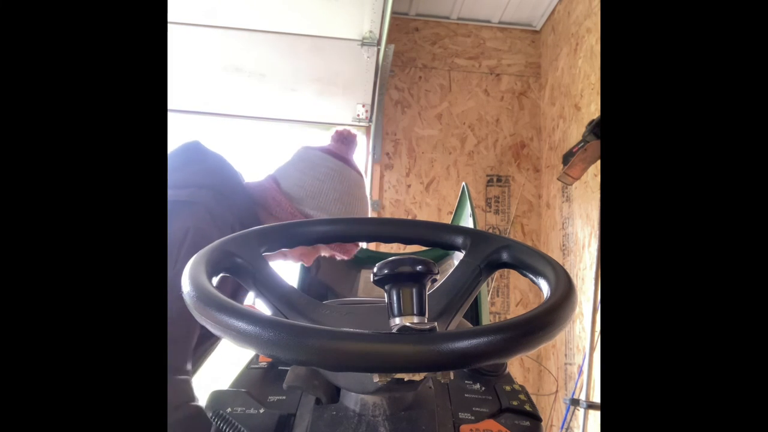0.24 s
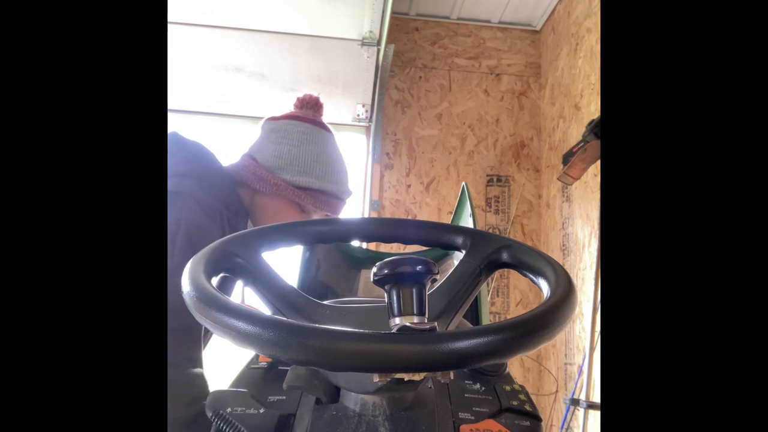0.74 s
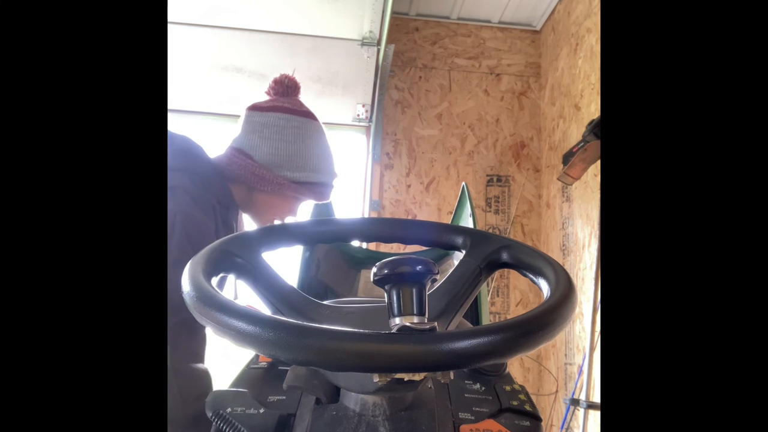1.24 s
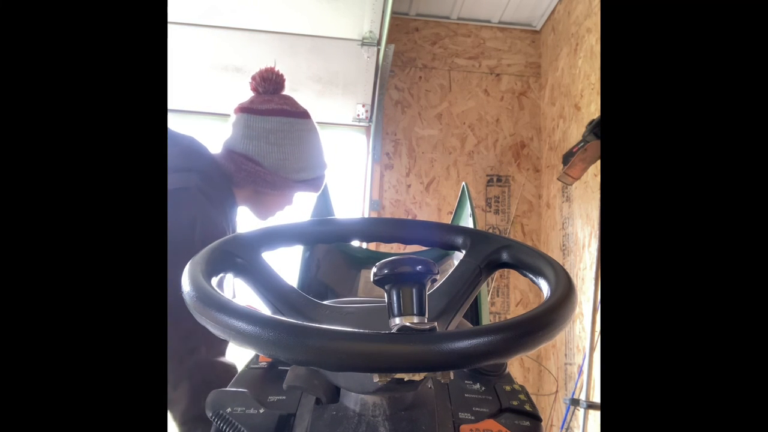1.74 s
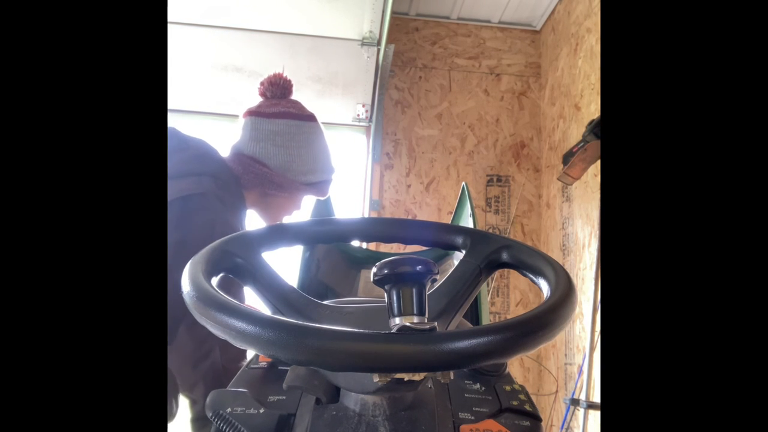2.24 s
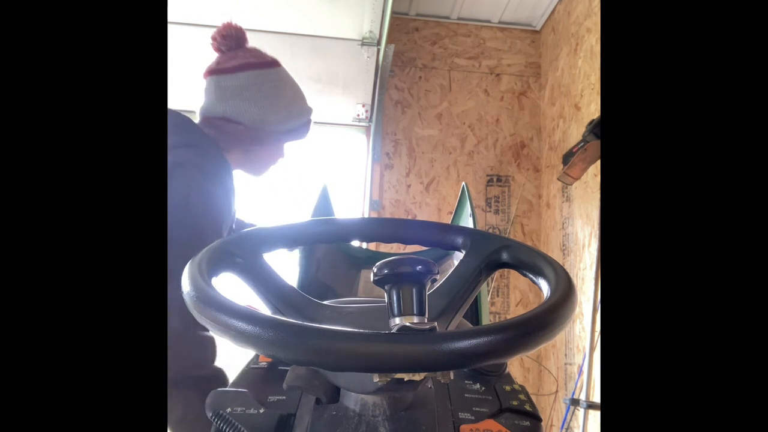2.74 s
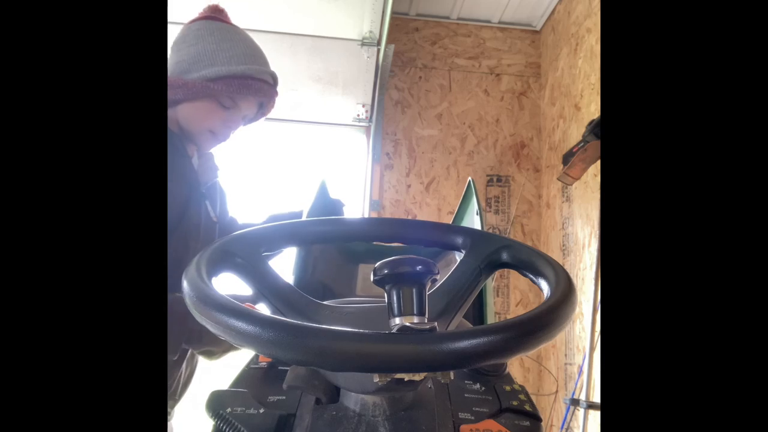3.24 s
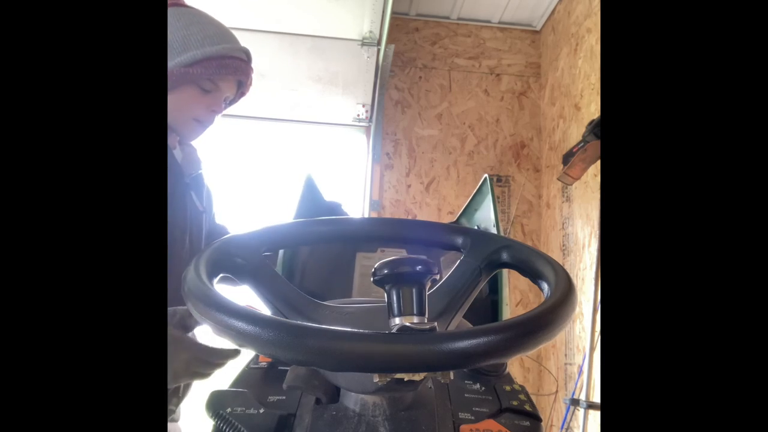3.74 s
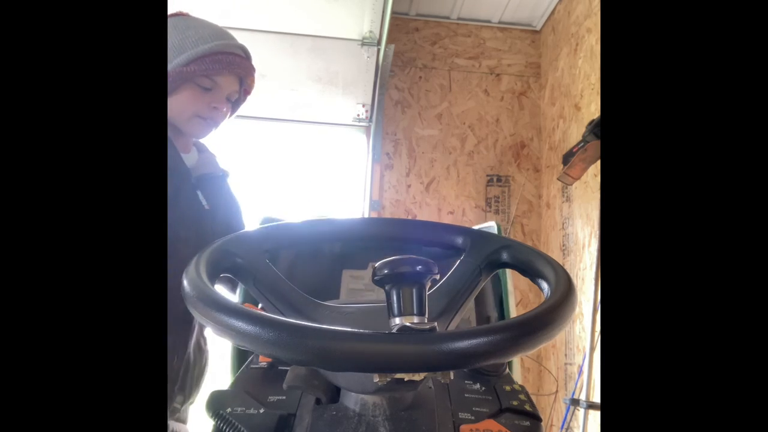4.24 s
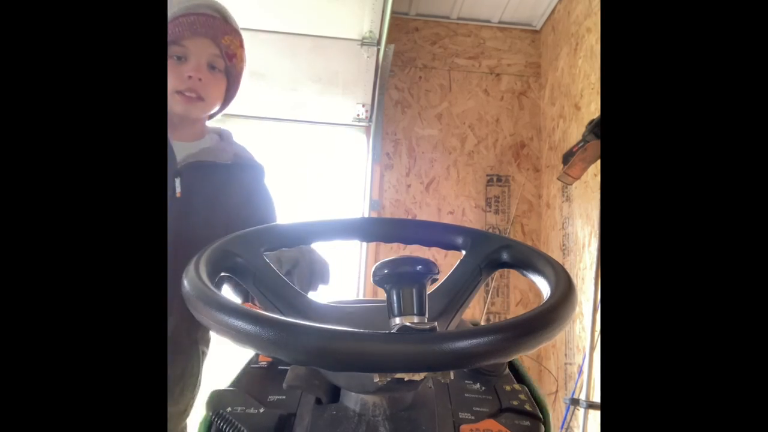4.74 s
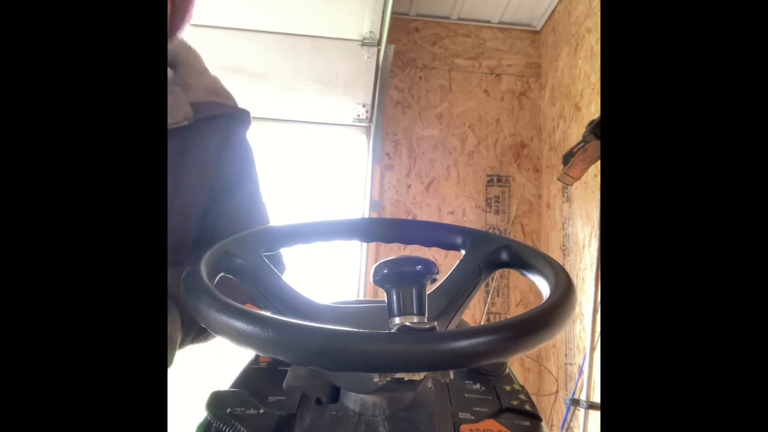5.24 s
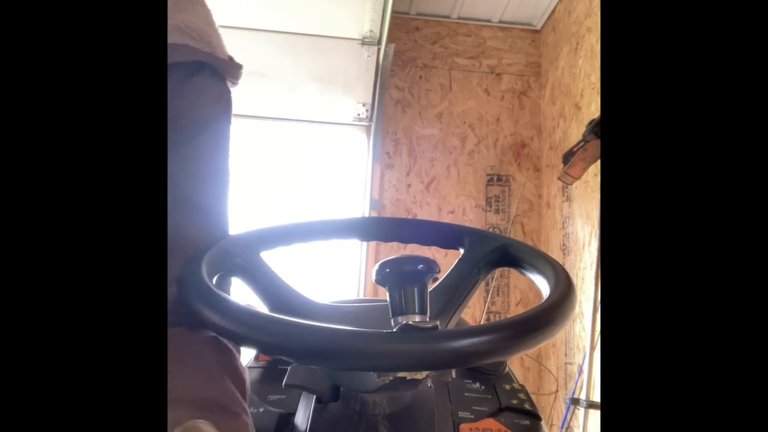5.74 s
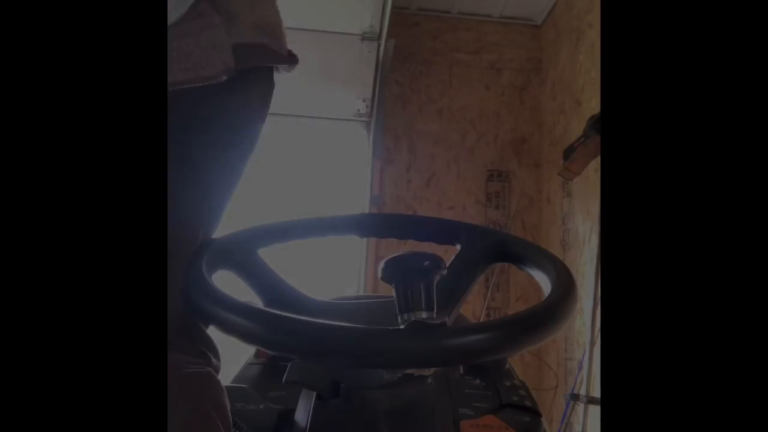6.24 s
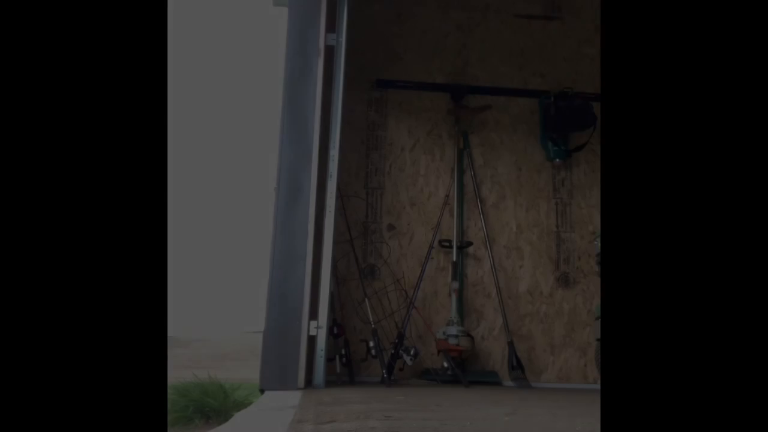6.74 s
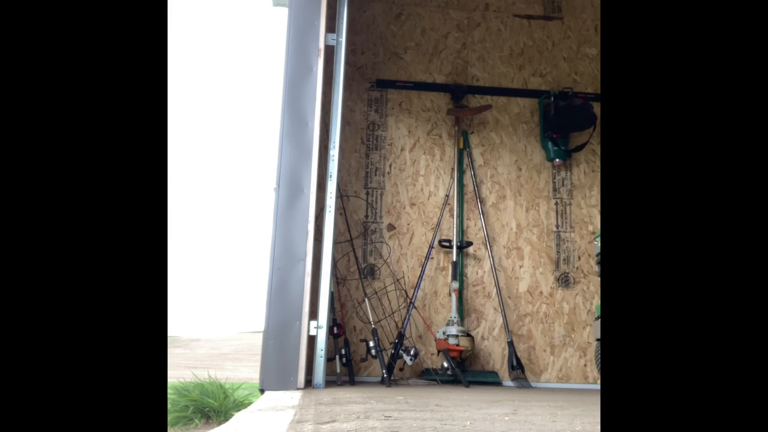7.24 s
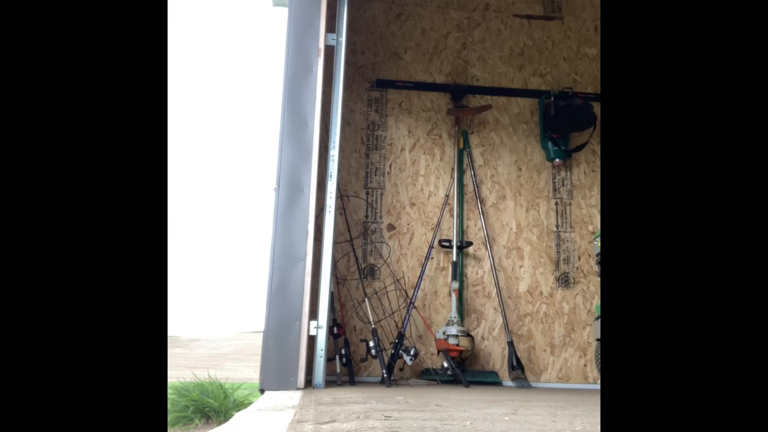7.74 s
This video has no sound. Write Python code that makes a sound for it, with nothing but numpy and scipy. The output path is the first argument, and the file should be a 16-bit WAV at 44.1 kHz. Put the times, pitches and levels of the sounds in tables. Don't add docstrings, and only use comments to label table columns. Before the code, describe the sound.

Close in a small wooden shed, fingers tap and sleeves rustle on loose plastic while faint birds whistle outside. Hollow knocks build into booming bangs and a hard slam with latch clinks and rattling. Smaller clunks follow, the sound dips nearly silent, then a lever clunks and an electric starter grinds and whines unevenly to the end.

```python
import sys
import numpy as np
from scipy import signal
from scipy.fft import rfft, irfft, next_fast_len
from scipy.io import wavfile
from scipy.ndimage import uniform_filter1d

SR = 44100
rng = np.random.default_rng(int(sys.argv[2]) if len(sys.argv) > 2 else 0)


def wav_out(sig):
    wavfile.write(sys.argv[1], SR, np.round(np.clip(np.atleast_2d(sig).T, -1, 1) * 32767).astype(np.int16))


def natural_amplitude(level_db):
    exponent = np.asarray(level_db, float) / 20
    return 10 ** exponent


N = 351918


def rms_one(x):
    return x / np.sqrt(np.mean(x ** 2) + 1e-20)


def in_time(rows):
    s, *columns = np.transpose(rows)
    return [np.interp(np.arange(N) / SR, s, c) for c in columns]


def colour(x, points):
    size = next_fast_len(len(x))
    hz, db = np.transpose(points)
    bin_hz = np.arange(size // 2 + 1) * SR / size
    gain = natural_amplitude(np.interp(np.log(bin_hz + 1), np.log(hz), db))
    return irfft(rfft(x, size) * gain, size)[:len(x)]


def band(x, low_hz, high_hz):
    edges = [low_hz, min(high_hz, .45 * SR)]
    return signal.sosfilt(signal.butter(2, edges, "band", fs=SR, output="sos"), x)


def ring(clicks, hz, t60):
    r, w = natural_amplitude(-60 / (t60 * SR)), 2 * np.pi * hz / SR
    return signal.lfilter([0, np.sin(w)], [1, -2 * r * np.cos(w), r * r], clicks + 1e-18)


def grains(per_s, spread_db):
    sizes = natural_amplitude(spread_db * np.minimum(rng.exponential(1, N), 5)) * rng.choice([-1, 1], N)
    return sizes * (rng.random(N) < per_s / SR)


def steady(x, window_s):
    return x / np.sqrt(uniform_filter1d(x ** 2, int(window_s * SR)) + 1e-12)


def flicker(size):
    return rms_one(band(rng.standard_normal(size), 4.6, 25))


def wavering(hz, width_hz):
    noise = rng.standard_normal((2, len(hz)))
    slow = signal.lfilter([1], [1, -np.exp(-np.pi * width_hz / SR)], noise)
    turn = 2 * np.pi * np.cumsum(hz) / SR
    return rms_one(slow[0] * np.cos(turn) + slow[1] * np.sin(turn))


def low_modes(rows, rise_s, t60, gain_db):
    out, t = np.zeros(N + SR), np.arange(SR // 3) / SR
    for s, peak_db, hz in rows:
        at = int(s * SR)
        fade = natural_amplitude(peak_db + gain_db - 60 * t / t60) * (1 - np.exp(-t / rise_s))
        out[at:at + len(t)] += fade * np.sin(2 * np.pi * hz * t)
    return out[:N]


def gliding_friction(rows, width):
    out = np.zeros(N)
    for start, end, from_hz, to_hz, db in rows:
        a, b = int(start * SR), min(int(end * SR), N)
        tone = wavering(np.linspace(from_hz, to_hz, b - a), width * from_hz)
        out[a:b] += natural_amplitude(db) * signal.windows.tukey(b - a, .25) * tone
    return out


def swells(s, held_s, db, rise, fall):
    t = np.arange(0, N / SR + .002, .002)[:, None]
    climb = rise * np.maximum(s - t, 0)
    sink = fall * np.maximum(t - s - np.abs(held_s), 0)
    power = natural_amplitude(2 * np.maximum(db - climb - sink, -200))
    return np.interp(np.arange(N) / SR, t[:, 0], 10 * np.log10(np.sum(power, axis=1)))


def louder(*dbs):
    return np.sqrt(sum(natural_amplitude(2 * db) for db in dbs))


# start in seconds, peak in dB, crack in dB against the peak,
# knock pitch in Hz, ring-down in seconds.
PANEL_BLOWS = [(1.646, -53.5, -16, 920, 0.24), (2.896, -38, -24, 817, 0.49),
               (3.024, -21.5, -30, 1061, 0.51), (3.205, -28.5, -27, 840, 0.3),
               (3.265, -36.5, -33.5, 875, 0.37), (3.414, -43, -8, 1210, 0.25),
               (3.926, -19, -25.5, 793, 0.32), (4.286, -11.5, -6.5, 900, 0.22),
               (4.770, -4.5, -16.5, 1258, 0.64), (5.496, -19, -33, 1185, 0.64),
               (5.769, -30, -10, 1090, 0.043), (5.916, -35, -6.5, 1350, 0.32),
               (6.693, -46.5, -10.5, 810, 0.3), (7.042, -15, -7.5, 1150, 0.76)]
EDGE_BLOWS = [(3.752, -40, -23, 894, 0.27), (3.827, -27.5, -22, 1248, 0.24), (4.161, -26.5, -27, 891, 1),
              (4.319, -5, -30, 903, 0.12), (4.362, -21, -30, 823, 1), (4.505, -37, -30, 865, 0.25),
              (4.697, -14, -27, 1006, 0.26), (5.215, -13.5, -38.5, 1090, 0.44),
              (5.841, -29, -11, 1103, 0.09), (6.804, -42, -18, 1690, 0.27),
              (6.813, -26.5, -12.5, 1038, 0.43)]
# start in seconds, peak in dB, knock pitch in Hz.
TAPS = [(.029, -48.5, 1006), (0.17, -43.5, 1010), (0.333, -43, 1430), (0.591, -39.5, 986),
        (0.722, -49, 1250), (1.053, -38.5, 914), (1.288, -43.5, 1484), (1.365, -49.5, 930),
        (1.838, -70, 2330), (2.599, -44.5, 864), (2.8, -59, 880)]
# start in seconds, peak in dB, knock pitch in Hz.
SHOVES = [
    (2.954, -43, 1030),
    (4.006, -43, 880),
    (5.13, -35.5, 1110),
]
PANEL_SHAKE_DB = -13.5


def all_blows():
    panel_boom_db, edge_boom_db, tap_boom_db, shove_boom_db = 4, -15, -16, 22
    edge_shake_db, tap_shake_db, shove_shake_db = -23, -40, -2.5
    panel_depth, edge_depth = .1, .26
    soft_crack_db, soft_ring_s = -27, 0.21
    rows = []
    for s, db, crack, hz, t60 in PANEL_BLOWS:
        rows.append((s, db, panel_boom_db, crack, hz, t60, panel_depth, PANEL_SHAKE_DB))
    for s, db, crack, hz, t60 in EDGE_BLOWS:
        rows.append((s, db, edge_boom_db, crack, hz, t60, edge_depth, edge_shake_db))
    for s, db, hz in TAPS:
        rows.append((s, db, tap_boom_db, soft_crack_db, hz, soft_ring_s, edge_depth, tap_shake_db))
    for s, db, hz in SHOVES:
        rows.append((s, db, shove_boom_db, soft_crack_db, hz, soft_ring_s, panel_depth, shove_shake_db))
    return sorted(rows)


# pitch in Hz, level in dB,
# ring-down (60 dB) in seconds.
HOOD = [(179.4, -3.5, 3.1), (280, -9.5, 0.2), (392, -2.5, 0.55), (445, -3.5, 0.23), (534, -19.5, 0.29),
        (697, -41, 1.0)]
# pitch in Hz, level in dB per Hz.
CLATTER = [(150, -15.5), (250, -2), (429, -4.5), (710, -7.5), (775, -11.5), (2620, -14), (3170, -0.5),
           (3580, -18.5), (10400, -42), (16000, -54)]
# pitch in Hz, level in dB.
RIBS = [(905, 0.5), (1150, -3.5), (1275, 0), (1674, -6), (2340, -2.5), (2756, -7), (3130, -7.5)]


def knocks():
    out, t = np.zeros(N + SR), np.arange(SR // 3) / SR
    clatter = rms_one(colour(grains(4000, spread_db=3.5), CLATTER))
    ribs = sum(natural_amplitude(db) * ring(clatter, hz, 0.051) for hz, db in RIBS)
    clatter = rms_one(clatter + natural_amplitude(-10.5) * rms_one(ribs))
    fine = grains(11000, spread_db=2.0)
    rattle = rms_one(band(fine, 2300, 4800))
    sharp = rms_one(band(fine[::-1], 4300, 13500))
    panels = [mode for mode in HOOD if mode[0] < 600] + [(225.2, -2.0, 0.48)]
    rows = all_blows()
    chance = rng.standard_normal((len(rows), 40))
    for (s, peak_db, boom_db, crack_db, hz, t60, depth, _), draw in zip(rows, chance):
        t60, at = np.clip(t60, .02, 1), int((s - .002) * SR)
        start = int(abs(draw[-1]) * SR) % (N - len(t))
        piece = slice(start, start + len(t))
        dull = np.vstack([signal.butter(6, 1.7 * hz, fs=SR, output="sos"),
                          signal.butter(2, depth * hz, "high", fs=SR, output="sos")])
        hit = natural_amplitude(-5.5) * signal.sosfilt(dull, clatter[piece]) * natural_amplitude(-60 * t / t60)
        for ratio, phase in zip(np.exp(.22 * draw[20:27]), draw[27:34]):
            hollow = np.sin(2 * np.pi * hz * ratio * t + 3 * phase)
            hit += natural_amplitude(-14) * hollow * natural_amplitude(-60 * t / (.3 * t60))
        hit += natural_amplitude(crack_db - 7.0) * rattle[piece] * natural_amplitude(-60 * t / (0.87 * t60))
        hit += natural_amplitude(crack_db - 4.0) * sharp[piece] * natural_amplitude(-60 * t / (0.41 * t60))
        hit *= 1 - np.exp(-t / 0.0043)
        swell = 1 - np.exp(-t / 0.021)
        for k, (mode_hz, db, mode_t60) in enumerate(panels):
            tone = np.sin(2 * np.pi * mode_hz * np.exp(0.0623 * draw[10 + k]) * t + 3 * draw[k])
            fade = natural_amplitude(-60 * t / min(mode_t60, 1.58 * t60))
            hit += natural_amplitude(boom_db + 1.7 * db - 8.0) * swell * fade * tone
        out[at:at + len(t)] += natural_amplitude(peak_db) * hit * np.minimum(1, 20 * (t[-1] - t))
    return out[:N]


# start in seconds, peak in dB, ring-down in seconds.
SNAPS = [(4.779, -13.5, 0.076), (4.79, -26.5, 0.37), (6.441, -56, .05), (6.688, -62, .15), (5.0, -53, .5),
         (5.84, -41.5, 0.059), (3.025, -42.5, 0.081), (5.497, -38, 0.18), (4.788, -31.5, 0.57),
         (1.053, -60, 0.04), (.168, -62.5, 0.041)]


def snaps():
    out, t = np.zeros(N), np.arange(SR // 3) / SR
    for s, peak_db, t60 in SNAPS:
        burst = band(rng.standard_normal(len(t)), 1800, 9900)
        out[int(s * SR):int(s * SR) + len(t)] += natural_amplitude(peak_db - 60 * t / t60) * burst
    return out


# start in seconds, peak in dB, pitch in Hz, dB step to each higher mode.
TICKS = [
    (4.3195, -6.5, 1010, -2),
    (4.6959, -22.5, 950, 0.5),
    (4.7806, -11.5, 1200, 1),
    (5.838, -27, 1150, -1.5),
    (5.919, -26, 1250, -1.5),
    (6.402, -22, 1230, 0.0),
]


def ticks():
    out = np.zeros(N)
    for s, peak_db, hz, step_db in TICKS:
        click = np.zeros(SR // 10)
        click[0] = natural_amplitude(peak_db - 8.0)
        at = int(s * SR) + 30
        for k, ratio in enumerate((1.0, 1.6, 2.6, 3.6, 4.4, 6.5)):
            out[at:at + len(click)] += natural_amplitude(k * step_db) * ring(click, hz * ratio, .006)
    return signal.sosfilt(signal.butter(4, [1050, 6500], "band", fs=SR, output="sos"), out)


# start in seconds, peak in dB, pitch in Hz.
PINGS = [(4.7785, -21.5, 10500), (4.7808, -12, 8130), (4.7808, -17.5, 12100), (4.7808, -20, 9960),
         (4.794, -26.5, 8470), (4.286, -22.5, 10800), (4.286, -21.5, 8500), (4.287, -29, 6500),
         (4.292, -19.5, 11200), (4.296, -21, 9200), (4.3197, -25, 8000), (5.921, -37.5, 8400)]


def pings():
    return low_modes(PINGS, rise_s=.0003, t60=.012, gain_db=0.5)


# start in seconds, peak in dB, pitch in Hz.
CLINKS = [(5.216, -18, 980), (5.216, -14.5, 1220), (4.7692, -15, 1300), (5.222, -19.5, 510),
          (5.84, -29, 690), (5.1, -38.5, 1200), (0.19, -46, 1000), (1.053, -43.5, 800), (5, -39.5, 1100),
          (5.917, -28.5, 750), (5.917, -29, 1000), (5.917, -30, 1400), (5.917, -32.5, 1740),
          (5.917, -32, 3320), (4.32, -15.5, 1000), (4.16, -32, 970)]


def clinks():
    return low_modes(CLINKS, rise_s=0.00091, t60=0.049, gain_db=1.5)


# start in seconds, peak in dB, pitch in Hz.
THUDS = [(2.549, -65, 72.7), (2.899, -45, 236), (2.931, -47, 202), (3.45, -46, 169), (4.2, -28, 177),
         (5.845, -19, 208), (5.917, -20.5, 156.5), (5.968, -26.5, 78), (6.417, -35.5, 152),
         (6.433, -37, 209), (6.822, -33.5, 186.5)]


def thuds():
    return low_modes(THUDS, rise_s=0.0036, t60=0.059, gain_db=4.5)


# start in seconds, peak in dB, ring-down in seconds.
BUZZES = [
    (3.023, -28.5, 0.22),
    (3.266, -44.5, 0.16),
    (5.496, -23.5, 0.44),
]


def brackets():
    drive, t = np.zeros(N), np.arange(SR // 2) / SR
    for s, peak_db, t60 in BUZZES:
        drive[int(s * SR):int(s * SR) + len(t)] += natural_amplitude(peak_db - 5.0 - 60 * t / t60)
    chatter = grains(2500, spread_db=-2.0)
    return drive * rms_one(sum(ring(chatter, hz, .012) for hz in (2380, 2720, 3050, 3200, 3550)))


# start in seconds, level in dB,
# pitch in Hz, ring-down in seconds.
RINGS = [(4.78, -26.5, 920, .3), (4.78, -30, 1075, 0.33), (4.779, -31, 1230, 0.35),
         (4.781, -32, 1370, 0.38), (4.78, -44, 1550, 0.37), (4.781, -35, 1950, 0.26), (4.78, -35, 2250, .3),
         (4.78, -36, 2650, .4), (4.79, -31, 3110, .3), (5.497, -35, 3100, .3), (5.498, -34.5, 2634, 0.28),
         (5.501, -30.5, 1390, 0.39), (5.5, -31.5, 1000, 0.39), (5.5, -40, 1900, .25),
         (5.5, -40, 3950, 0.47), (5.56, -45, 2380, .15), (5.5, -24.5, 327, 0.24),
         (5.855, -28.5, 259.3, 0.32), (6.809, -46, 1520, .3), (.592, -54, 635, .25), (.592, -55, 1047, .2),
         (1.053, -60, 700, .2), (.335, -59, 1305, 0.22)]


def rings():
    out, t = np.zeros(N), np.arange(SR // 3) / SR
    for s, db, hz, t60 in RINGS:
        fade = natural_amplitude(db - 60 * t / t60) * np.minimum(1, t / .002) * np.minimum(1, 20 * (t[-1] - t))
        out[int(s * SR):int(s * SR) + len(t)] += fade * wavering(hz + 0 * t, 25)
    return out


# time in seconds, frame rumble in dB.
MOTION = [(0, -72.5), (.5, -71), (1.4, -70), (1.56, -75), (1.68, -73), (2.75, -68), (2.93, -56), (3.1, -37),
          (3.4, -50), (3.85, -59.5), (3.97, -43.5), (4.3, -48), (4.6, -44.5), (4.75, -51.5), (4.8, -32),
          (5.2, -47), (5.47, -52.5), (5.67, -46.5), (5.92, -41), (6.12, -56), (7.02, -71.5)]
# start in seconds, held time in seconds,
# rustle in dB, creak in dB against the rustle.
STROKES = [(0.018, 0.0056, -54.5, 4.5), (.21, 0.023, -65, 3.5), (.37, 0.052, -57.5, -4.5),
           (.6, 0.017, -64, 7), (0.798, 0.046, -54.5, -0.5), (1.07, 0.025, -66.5, 7.5),
           (1.3, 0.012, -63, -1), (1.66, 0.035, -67.5, 1.5), (1.8, 0.2, -70.5, 6), (2.2, 0.03, -84, 14),
           (2.66, 0.15, -66, 3), (2.9, 0.13, -57, 2), (3.239, 0.066, -68.5, 19), (3.41, 0.033, -58.5, 4),
           (3.55, 0.52, -58.5, 0.5), (3.93, 0.062, -49, -14), (4.12, 0.24, -50.5, 4),
           (4.32, 0.42, -45.5, -1.5), (5.05, 0.15, -54, 17), (5.33, 0.036, -52, 1),
           (5.42, 0.096, -46.5, -20), (5.6, 0.19, -50.5, -11.5), (5.85, 0.18, -49, -30),
           (6.1, 0.19, -59.5, -6.5), (6.449, 0.025, -60.5, -4.5), (6.81, 0.12, -61, -28),
           (7.02, .02, -54, -3)]


def handling_gains():
    motion_db, = in_time(MOTION)
    swing = motion_db + 56
    s, held, db, creak_db = np.transpose(STROKES)
    slopes = 309, 149.5
    hit_s, peak_db, _, crack_db, *_, shake_db = np.transpose(all_blows())

    def after(left_db, fall):
        return swells(hit_s + 0.028, 0, peak_db + left_db, 400.5, fall)

    joint_db = np.minimum(shake_db, PANEL_SHAKE_DB) - 8
    shudder = louder(-58 + 0.85 * swing, after(shake_db, 59.5))
    touch = natural_amplitude(swells(s, held, db + creak_db - 2.5, *slopes))
    creak = louder(-65.5 + 0.45 * swing, after(joint_db, 169.5), swells(s, held, db + creak_db, *slopes))
    rustle = louder(-71.5 + .5 * swing, after(-19 + .5 * crack_db, 247), swells(s, held, db, *slopes))
    return shudder, touch, creak, rustle, natural_amplitude(motion_db)


# pitch in Hz, level in dB per Hz.
CREAK = [(350, -11.5), (600, -0.5), (804, -10), (968, -5), (1610, -13), (1870, -12), (3300, -19.5),
         (4290, -35), (7260, -120)]
# pitch in Hz, level in dB per Hz.
RUSTLE = [(1470, -2.5), (2500, -4), (5610, -11), (7300, -13.5), (8800, -11.5), (9580, -12), (12100, -15),
          (16000, -19)]


def handling():
    shudder_gain, touch_gain, creak_gain, rustle_gain, rumble_gain = handling_gains()
    slips = grains(2000, spread_db=1.5)
    panels = [(hz, db) for hz, db, t60 in HOOD if hz < 800] + [(130, -8.5), (226, -3), (330, -1.0)]
    shudder = sum(natural_amplitude(0.21 * db) * ring(slips * rng.standard_normal(N), hz, 0.086) for hz, db in panels)
    shudder = steady(band(shudder, 150, 1100), 0.6)
    creak = rms_one(colour(grains(2500, spread_db=0.5), CREAK))
    rustle = rms_one(colour(grains(8000, spread_db=2.5), RUSTLE))
    rumble = steady(band(rng.standard_normal(N), 31, 110), 0.2)
    total = shudder_gain * shudder + touch_gain * band(shudder, 300, 900)
    total += creak_gain * creak + rustle_gain * rustle + rumble_gain * rumble
    return total * (np.arange(N) < 7.04 * SR)


# start and end in seconds, start and end pitch in Hz, level in dB.
SLIDES = [(5.93, 6.40, 1900, 2060, -58.5), (6.40, 6.55, 2300, 1800, -59.5), (5.92, 6.16, 4400, 3700, -60),
          (6.1, 6.24, 5350, 5400, -63), (6.17, 6.24, 5300, 1600, -63), (6.43, 6.54, 5350, 5300, -70),
          (6.44, 6.54, 11000, 11600, -79), (4.34, 4.70, 8500, 8400, -57), (4.46, 4.62, 9800, 8100, -57.5),
          (4.42, 4.62, 11800, 11500, -60), (4.36, 4.5, 2400, 2250, -47.5), (5.36, 5.49, 4700, 3800, -66),
          (5.62, 5.76, 3800, 3000, -58), (7.8, 7.98, 1500, 1560, -36.5), (7.07, 7.3, 2080, 1600, -34),
          (7.05, 7.26, 1150, 1100, -27.5), (5.22, 5.33, 1060, 1100, -43), (4.77, 5.0, 100, 30, -44.5),
          (5.15, 5.4, 66, 42, -42.5), (5.55, 5.8, 66, 39, -42), (6.82, 7.0, 130, 110, -59),
          (3.96, 4.1, 270, 200, -34.5), (2.95, 3.02, 380, 330, -42), (3.6, 3.75, 190, 185, -53.5),
          (3.27, 3.315, 2800, 2400, -55), (3.42, 3.46, 2300, 2250, -59), (6.82, 6.98, 4200, 4200, -61),
          (4.1, 4.28, 190, 150, -42), (4.7, 4.9, 150, 160, -33)]


def slides():
    return gliding_friction(SLIDES, width=.05)


ENGAGE_S = 7.035
# start in seconds, held time in seconds, level in dB,
# choice from 0 (low) to 1 (high).
WHINES = [
    (7.085, 0.04, -21.5, 0),
    (7.155, .04, -31.5, 0.99),
    (7.239, .08, -40.5, 0.025),
    (7.5, 0.044, -29.5, 0.0071),
    (7.555, 0.024, -32.5, 0.97),
    (7.611, 0.052, -38, 0.013),
    (7.7, .03, -32.5, 0.97),
    (7.745, 0.12, -26.5, 0.011),
]
# start in seconds, held time in seconds,
# grind in dB.
EFFORTS = [
    (7.05, 0.0041, -18),
    (7.255, 0.034, -21.5),
    (7.367, 0.0057, -18),
    (7.495, 0.0043, -18),
    (7.584, 0.01, -18),
    (7.692, 0.047, -19.5),
    (7.835, 0.0073, -18),
    (7.975, 0.0082, -17),
]


def starter_controls():
    t = np.arange(N) / SR
    settle_s = 7.376
    settle_db = -4.5 * np.clip((t - settle_s) / 0.0054, 0, 1)
    settle_db -= 1288 * np.clip(7.045 - t, 0, .1)
    s, held, db, high = np.transpose(WHINES)
    which = high[np.clip(np.searchsorted(s - .01, t) - 1, 0, None)]
    low_hz, high_hz = 682.5, 809
    whine_hz = low_hz + (high_hz - low_hz) * uniform_filter1d(which, size=600)
    whine_db = swells(s, held, db, 311, 129)
    shaft_hz = 1797 - 470 * np.maximum(t - settle_s, 0)
    effort_db = 20 * np.log10(louder(-28.5, swells(*np.transpose(EFFORTS), 136, 323)))
    kick_db = swells(ENGAGE_S + 0.017, 0.02, -24, 250, 19)
    body_db = 20 * np.log10(louder(kick_db, -29.5)) + settle_db
    housing_db = -25 + 0.77 * (effort_db + 24.0) - 4.5 * (t - ENGAGE_S)
    housing_db = 20 * np.log10(louder(housing_db, kick_db)) + settle_db
    return whine_hz, whine_db, shaft_hz, effort_db + settle_db, body_db, housing_db


# time in seconds, teeth per second.
MESH = [
    (7.035, 835),
    (7.103, 876.7),
    (7.161, 800),
    (7.269, 844.2),
    (7.329, 784.6),
    (7.457, 837.8),
    (7.613, 819),
    (7.663, 787.1),
    (7.98, 765),
]
# multiple of the tooth rate, level in dB.
MESH_ORDERS = [(2, -23), (3, -19), (4, -11.5), (5, -13.5), (6, -7)]
# pitch in Hz, width in Hz, level in dB.
HOUSING = [(2770, 17, 11), (3065, 320, 2), (3850, 39, -3), (4050, 42, -2), (4886, 620, 5), (5840, 52, 0),
           (6650, 46, 0), (8350, 43, -10.5), (9130, 730, -8), (10450, 200, -8), (11100, 63, -27.5),
           (12600, 130, -13.5)]
# pitch in Hz, level in dB per Hz.
GRIND = [(1290, -41), (2200, -22), (3120, -6), (3530, -15.5), (4800, 4.5), (7450, 0.5), (9020, 10.5),
         (9800, 1), (14600, -8), (16000, 4)]
# pitch in Hz, level in dB per Hz.
BODY = [(47, -47), (80, -11.5), (178, -4.5), (297, -7.5), (391, -6), (580, -9), (691, 1.5), (1370, -14),
        (1780, -10.5), (2600, -17.5), (3380, -49), (5720, -120)]


def starter():
    first = 7 * SR
    size = N - first
    whine_hz, whine_db, shaft_hz, grind_db, body_db, housing_db = (c[first:] for c in starter_controls())
    tooth_hz = in_time(MESH)[0][first:]
    wobble = rms_one(band(rng.standard_normal(size), 15, 60))
    phase = np.cumsum(whine_hz * (1 + 0.013 * wobble)) / SR
    unsteady = natural_amplitude(3.3 * rms_one(band(rng.standard_normal(size), 21, 95)))
    whine = np.sqrt(2) * np.sin(2 * np.pi * phase) * unsteady
    whine = rms_one(whine + 0.65 * wavering(whine_hz, 57))

    strikes = np.diff(np.floor(np.cumsum(tooth_hz) / SR), prepend=0) > 0
    teeth = strikes * (0.2 + rng.standard_normal(size)) * np.sqrt(SR / 700)
    drive = 0.15 * teeth + rms_one(grains(9000, spread_db=-1.5))[first:]
    modes, speed = 0, tooth_hz / np.mean(tooth_hz)
    for hz, width_hz, db in HOUSING:
        patch = natural_amplitude(1.8 * flicker(size))
        modes = modes + natural_amplitude(db) * np.sqrt(width_hz) * patch * wavering(hz * speed ** .4, 0.76 * width_hz)
    mesh = 0
    for k, db in MESH_ORDERS:
        mesh = mesh + natural_amplitude(db + 1.1 * flicker(size)) * wavering(k * tooth_hz, 5.6 * k)
    grind = natural_amplitude(-1.0) * rms_one(modes) + mesh + rms_one(colour(drive, GRIND))

    broad = colour(rng.standard_normal(size), BODY)
    housing = natural_amplitude(-5.5) * wavering(shaft_hz, 60) + natural_amplitude(-12.0) * wavering(.6 * shaft_hz, 51)
    housing = rms_one(housing + rms_one(band(broad, 930, 2130)))
    body = steady(band(broad, 57, 600), 0.072)
    engaged = np.clip((np.arange(first, N) / SR - ENGAGE_S) / 0.016 + 1.34, 0, 1) ** 2
    running = natural_amplitude(whine_db) * whine + natural_amplitude(grind_db) * rms_one(grind)
    running += natural_amplitude(body_db) * body + natural_amplitude(housing_db) * housing
    return np.pad(engaged * running, (first, 0))


# start and end in seconds, start and end pitch in Hz, level in dB.
SINGS = [(7.45, 7.75, 2800, 4720, -35.5), (7.72, 7.98, 4720, 4560, -37), (7.47, 7.62, 3320, 3000, -36.5),
         (7.66, 7.82, 3170, 3090, -37.5), (7.86, 7.98, 3830, 3850, -41), (7.27, 7.42, 2790, 2770, -38.5),
         (7.5, 7.62, 2770, 2000, -44.5), (7.81, 7.9, 3900, 3200, -41), (7.88, 7.98, 2300, 2290, -40.5),
         (7.24, 7.4, 4600, 5600, -33.5), (7.4, 7.7, 800, 915, -41), (7.55, 7.8, 1460, 1455, -40.5),
         (7.1, 7.22, 400, 410, -28.5)]


def gear_singing():
    return gliding_friction(SINGS, width=.006)


# start in seconds, peak in dB, pitch in Hz.
THUMPS = [
    (7.209, -24, 42.4),
    (7.321, -26, 43.6),
    (7.459, -37, 42.5),
    (7.508, -35, 42.7),
    (7.569, -29, 43.5),
    (7.649, -28.5, 41),
    (7.739, -35.5, 43.4),
    (7.819, -29.5, 43.5),
    (7.899, -30, 42.6),
]


def compression():
    return low_modes(THUMPS, rise_s=0.0081, t60=0.24, gain_db=6.0)


# start and end in seconds, start and end pitch in Hz, level in dB.
BIRDS = [(.69, .74, 2520, 2510, -69.5), (1.39, 1.503, 2750, 2720, -78), (1.70, 1.90, 4650, 4650, -75),
         (1.82, 2.143, 4350, 4540, -77), (1.825, 1.926, 2370, 2340, -66.5), (1.85, 1.913, 2300, 1970, -70),
         (1.948, 2.012, 2400, 2000, -66), (2.029, 2.07, 2390, 2300, -70), (1.66, 1.83, 1860, 2000, -76),
         (2.345, 2.385, 4050, 3320, -77), (2.47, 2.525, 3650, 4050, -74), (2.432, 2.504, 2380, 2440, -75),
         (2.33, 2.432, 2820, 2730, -72), (2.45, 2.512, 2720, 2710, -71), (2.477, 2.558, 3050, 3040, -75),
         (2.544, 2.616, 3630, 3970, -72), (2.837, 2.88, 4150, 3850, -68), (2.958, 3.007, 3630, 4250, -72),
         (3.312, 3.352, 4250, 3850, -62.5), (3.383, 3.45, 3300, 3256, -60), (3.457, 3.503, 3820, 4520, -64),
         (3.524, 3.58, 3680, 4600, -66), (3.552, 3.663, 1960, 1920, -62)]


def birds():
    out = np.zeros(N)
    flutter = natural_amplitude(4.7 * rms_one(band(rng.standard_normal(N), 6.8, 59)))
    for start, end, from_hz, to_hz, db in BIRDS:
        a, b = int(start * SR), int(end * SR)
        hz = np.linspace(from_hz, to_hz, b - a) * flutter[a:b] ** 0.011
        out[a:b] += natural_amplitude(db) * np.sqrt(np.hanning(b - a)) * np.sin(2 * np.pi * np.cumsum(hz) / SR)
    return out * flutter


# pitch in Hz, time to die by 60 dB in seconds.
SHED_T60 = [(100, 0.8), (500, 0.63), (2000, 0.6), (6000, 0.46), (15000, .2)]


def shed(x):
    t, tail = np.arange(SR // 2) / SR, 0
    for (low, t60), (high, _) in zip(SHED_T60, SHED_T60[1:]):
        noise = band(rng.standard_normal(len(t)), low, high)
        tail = tail + noise * natural_amplitude(-60 * t / t60) * (t > .008)
    return signal.fftconvolve(x, tail / np.sqrt(np.sum(tail ** 2)))[:N]


# pitch in Hz, side level against the middle in dB.
WIDTH = [(60, -8), (110, -10.5), (200, -20.5), (380, -20.5), (700, -5), (1290, -2.5), (2380, -1.5),
         (5200, -1), (6500, -21.5), (15000, -60.5)]


def two_ports(mid, walls):
    t = np.arange(N) / SR
    paths = signal.fftconvolve(mid[None], walls / np.sqrt(np.sum(walls[0] ** 2)), axes=1)[:, :N]
    turn = 2 * np.pi * 2.8 * t
    scattered = paths[0] * np.cos(turn) + paths[1] * np.sin(turn)
    lagging = signal.hilbert(mid, next_fast_len(N))[:N].imag
    side = colour(0.97 * lagging + 1.01 * scattered - 0.075 * mid, WIDTH) - 0.012 * mid
    return np.array([mid + side, mid - side])


def scene():
    t = np.arange(N) / SR
    blows = knocks() + brackets() + thuds()
    gap = np.clip(np.abs(t - 6.556) / 0.0318, .05, 1)
    touches, far, engine = handling(), birds(), starter()
    near = natural_amplitude(-0.62) * touches + far + blows + ticks()
    echo = shed(blows + natural_amplitude(2.0) * touches + natural_amplitude(1.5) * engine)
    mid = gap * (near + natural_amplitude(-11.0) * echo) + natural_amplitude(-0.68) * engine + compression()
    walls = rng.standard_normal((2, SR // 8)) * natural_amplitude(-60 * t[:SR // 8] / 0.12)
    mid += gap * (slides() + gear_singing() + rings() + snaps() + pings() + clinks())
    return two_ports(mid, walls)


def top_cut(x):
    return signal.sosfilt(signal.butter(12, 15900, fs=SR, output="sos"), x)


def record(dry):
    cut = signal.sosfilt(signal.butter(4, 37, "high", fs=SR, output="sos"), dry)
    cut = signal.sosfilt(signal.cheby2(10, 50, 16300, fs=SR, output="sos"), cut)
    mix = 1.134 * np.tanh(cut / 1.074)
    return top_cut(mix)


dry = scene()
out = record(dry)
wav_out(out)
```